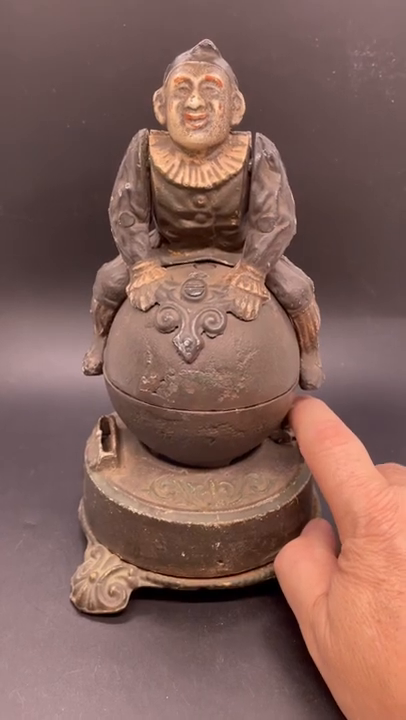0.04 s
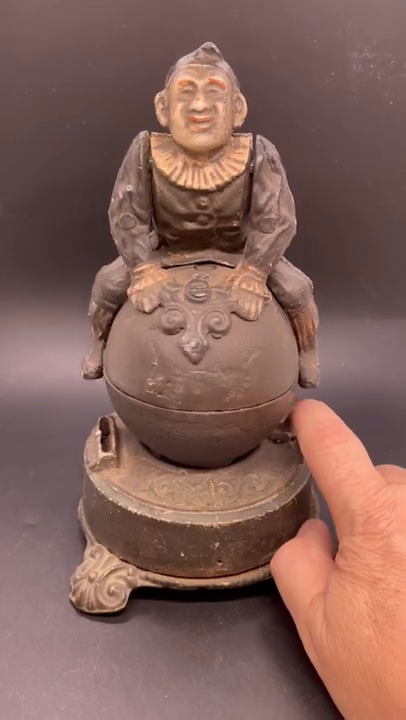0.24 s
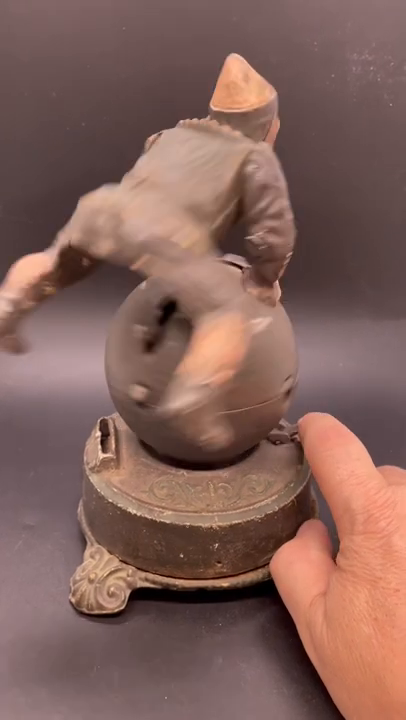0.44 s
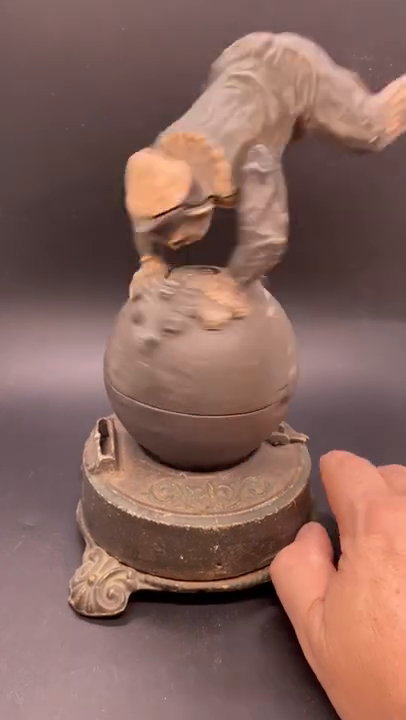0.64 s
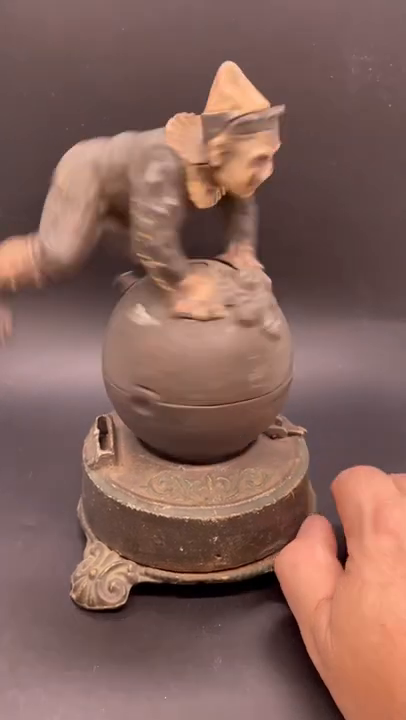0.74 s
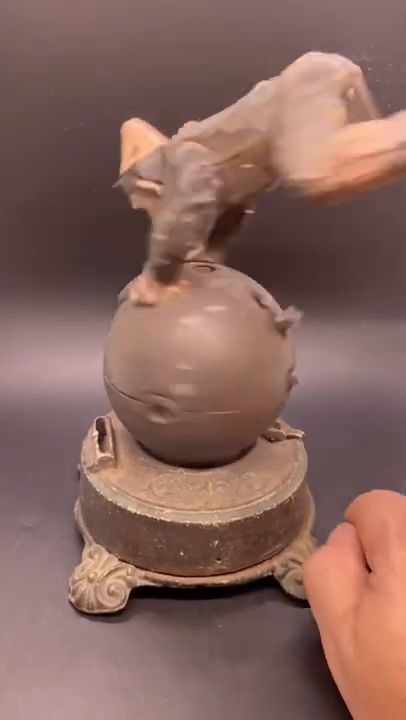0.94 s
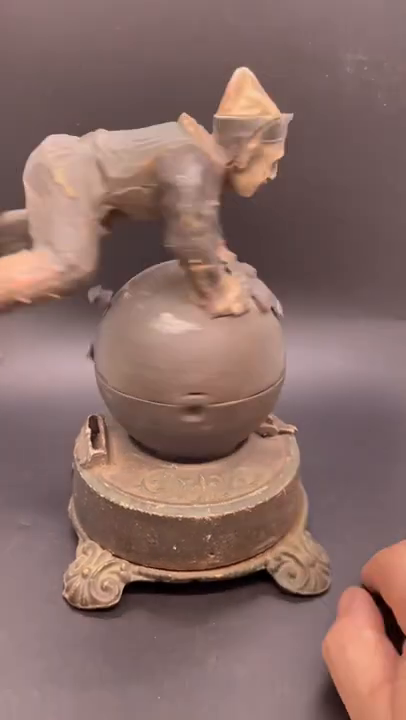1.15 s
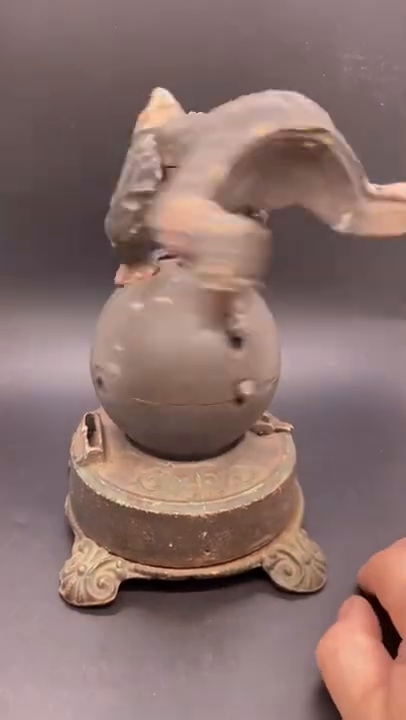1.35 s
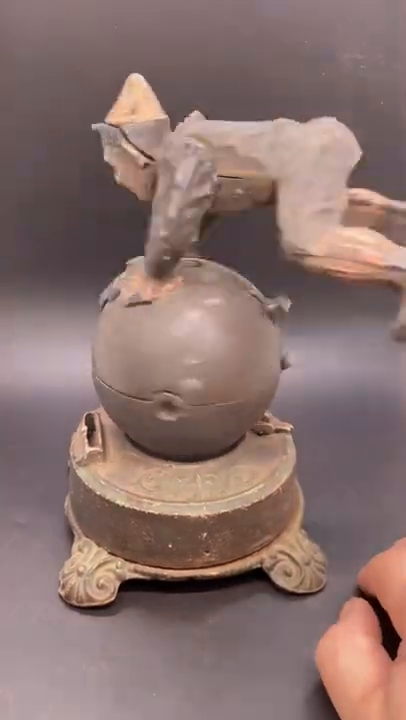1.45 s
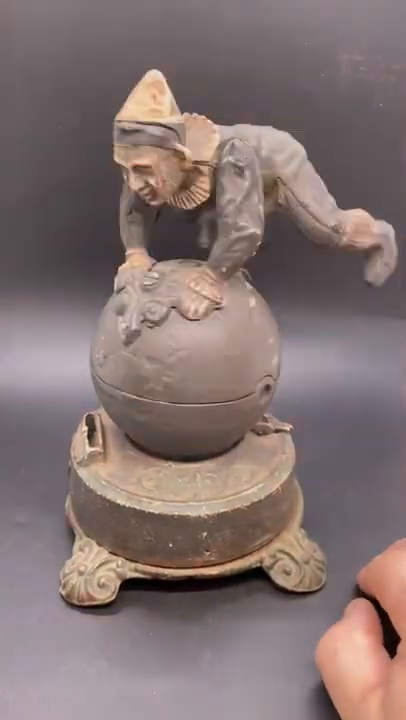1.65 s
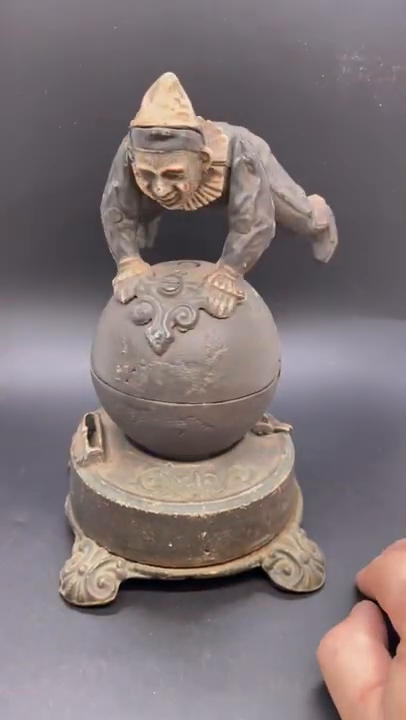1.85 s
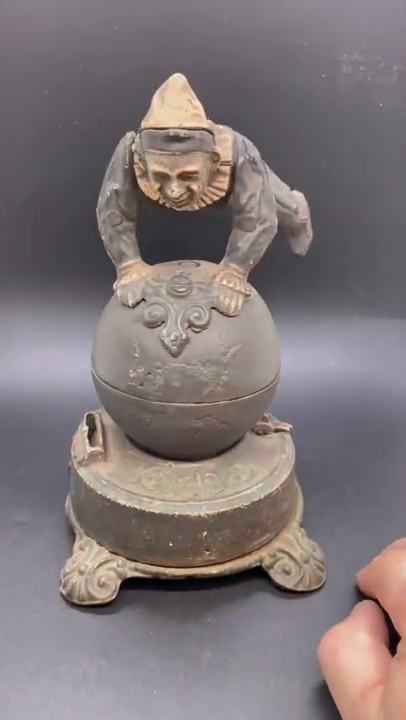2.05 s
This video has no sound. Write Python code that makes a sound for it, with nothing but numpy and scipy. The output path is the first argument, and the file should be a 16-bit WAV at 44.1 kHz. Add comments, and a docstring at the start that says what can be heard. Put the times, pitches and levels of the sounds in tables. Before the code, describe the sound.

A cast-iron mechanical bank is tripped by its lever. Faint hum until about 0.16 s, small clicks, then hard iron clacks at 0.26-0.4 s with a burst of scraping. After a brief dip, dry gritty scraping surges unevenly from 0.55 to 1.35 s, with irregular knocks and low table thuds. Weaker clanks near 1.47 s fade by 1.8 s, leaving hum. Close stereo phone pickup, short room tail.

```python
"""A sharp iron clack, then scraping and irregular knocks that die away over soft thuds and a faint room hum.
A finger trips the lever of a cast-iron coin bank and the spring throws the figure up; globe and figure
spin down on a dry, loose spindle. Noise bursts (knocks) and random slips (scrape) excite the resonances
of the casting; noise also drives the hollow base and the table top. Two close microphone ports of a
phone hear it with a short room tail, air noise and a slightly wavering hum."""
import sys
import numpy as np
from scipy import signal
from scipy.fft import rfft, irfft, next_fast_len
from scipy.io import wavfile
from scipy.ndimage import map_coordinates

SR = 44100
rng = np.random.default_rng(int(sys.argv[2]) if len(sys.argv) > 2 else 0)


def ratio(d):
    """dB to gain"""
    e = np.asarray(d, float) / 20
    return 10 ** e


def pcm_store(signal):
    """Save signal as 16-bit PCM."""
    levels = np.round(np.clip(np.atleast_2d(signal), -1, 1) * 32767)
    wavfile.write(sys.argv[1], SR, levels.astype(np.int16).T)


N = 92610

SPLIT_HZ = 3200  # scrape and knocks have a drive of their own above this
SHEEN_DB = 13.5  # gain of the drive above SPLIT_HZ


def unit(x):
    """Normalization by mean power: scaled to rms 1."""
    return x / np.sqrt(np.mean(x ** 2) + 1e-20)


def along(points, hz):
    """Interpolation of (hz, value) points on a logarithmic frequency axis."""
    f, v = np.transpose(points)
    return np.interp(np.log(hz + 1), np.log(f + 1), v)


def wobble(rate):
    """Slow random modulation: a spline through `rate` normal random knots a second."""
    knots = rng.standard_normal(N // 100)
    return map_coordinates(knots, [np.arange(N) * rate / SR])


def filtered(x, response):
    """Linear filtering: the spectrum of x times a complex response of frequency."""
    m = next_fast_len(N + SR // 2)
    f = np.fft.rfftfreq(m, 1 / SR)
    return irfft(rfft(x, m) * response(f), m)[..., :N]


def level(response):
    """Power normalization: white noise keeps its rms through the response."""
    return response / np.sqrt(np.mean(np.abs(response) ** 2))


def below(f, hz=SPLIT_HZ):
    """Low-pass crossover gain; one minus it is the complementary high-pass."""
    return 1 / (1 + (f / hz) ** 8)


def modes(table, f):
    """Modal superposition: a causal sum of damped resonances of alternating sign."""
    total = 0
    for k, (centre, width, db) in enumerate(table):
        damping = 1j * f * width
        total = total + (-1) ** k * ratio(db) * damping / (centre * centre - f * f + damping + 1e-9)
    return total


def causal(gain):
    """Minimum-phase response of a gain, by folding its cepstrum onto positive time."""
    c = irfft(np.log(gain + 1e-6))
    h = len(c) // 2
    folded = np.r_[c[0], 2 * c[1:h], c[h], np.zeros(h - 1)]
    return np.exp(rfft(folded))


def bank():
    """Coupled structures: scrape and knocks excite the casting; base and table answer the wobbling load."""
    scrape, rumble, treble, shake = spindle_load()
    bands, shapes, favour_hz = knock_envelopes()
    chatter = ratio(2 * wobble(61))  # flutter of the scrape: 2 dB, 61 knots a second
    burst = rng.standard_normal(N)

    def rub():
        return scraping(scrape * chatter, treble * chatter)

    def blows(hz):
        return knocking(hz, bands, shapes, favour_hz, burst)

    knock = (bands[0] @ shapes) * burst
    return iron(rub, blows) + hollow_base(rumble, knock) + table_top(shake)


def spindle_load():
    """Friction of a spinning load: drive amplitudes over time for scrape, rumble, treble and shake."""
    # the spindle rubbing, drive levels ahead of any gain or resonance:
    # start_s, scrape_db, base_rumble_db, scrape_treble_db, table_shake_db
    spin = [(0.161, -44, -52, -54, -27), (0.225, -37, -40, -52, -57), (0.233, -36.5, -30, -72, -31),
            (0.27, -24, -20, -42.5, -17.5), (0.383, -22.5, -29, -38, -23), (0.427, -46.5, -41.5, -57, -56),
            (0.551, -30, -33, -48, -28.5), (0.6, -27, -29, -43, -24), (0.682, -26.5, -36, -36.5, -26),
            (0.733, -28.5, -17.5, -35.5, -23.5), (0.767, -29.5, -42, -52.5, -32),
            (0.851, -27.5, -23.5, -43.5, -23), (0.889, -26.5, -25, -38, -22.5),
            (0.959, -23.5, -28, -38, -25.5), (1.0, -28.5, -29.5, -43, -32.5), (1.097, -26, -22.5, -39, -17),
            (1.19, -34.5, -33.5, -55, -34.5), (1.29, -32, -39, -50.5, -24.5),
            (1.334, -28.5, -32, -40, -21.5), (1.378, -48, -37.5, -66, -35),
            (1.48, -39.5, -33.5, -76, -31.5), (1.549, -49, -45, -73, -34), (1.7, -54, -38.5, -63.5, -36),
            (1.8, -65.5, -65, -80.5, -54)]
    t = np.arange(N) / SR
    start_s, *columns = np.transpose(spin)
    return [ratio(np.interp(t, start_s, db, -120, -120)) for db in columns]


def knock_envelopes():
    """Impact of finite contact time: band amplitudes and pulse shape of each knock, and its favoured pitch."""
    # knocks of loose iron parts, drive levels ahead of the gains below:
    # start_s, peak_db, brightness_db, best_caught_mode_hz
    knocks = [(0.176, -29, -2.5, 1650), (0.229, -25.5, -36, 1558), (0.261, -12.5, -34, 2540),
              (0.316, -9, -13, 854), (0.361, -14, -27.5, 741), (0.401, -15.5, -1, 741),
              (0.488, -44.5, 7, 1278), (0.617, -18.5, -13.5, 2540), (0.663, -24, -28, 2040),
              (0.698, -13, -18, 1090), (0.868, -25.5, -11.5, 741), (1.023, -18.5, -15.5, 741),
              (1.098, -23, -14.5, 1278), (1.255, -34.5, 0, 5290), (1.309, -13, -12, 1278),
              (1.37, -26.5, -15.5, 2040), (1.421, -26, -22.5, 5290), (1.471, -19, -24, 3250),
              (1.543, -35, -31.5, 854), (1.579, -30, -20, 741), (1.681, -35.5, -19, 3250),
              (1.699, -32, -29.5, 741), (1.769, -44.5, -25.5, 2040), (1.793, -42.5, -34, 854),
              (2.002, -45.5, -40.5, 854)]
    start_s, peak_db, bright_db, favour_hz = np.transpose(knocks)
    rise_s, fall_s = 0.003, 0.01  # linear rise; time constant of the Gaussian fall
    knock_db = -2.5
    usual_db, middle_share = -14, 0.8  # the middle band follows brightness in part, about the usual one
    since = np.maximum(np.arange(N) / SR - start_s[:, None], 0)
    shapes = np.minimum(since / rise_s, 1) * np.exp(-(since / fall_s) ** 2)
    tilt_db = np.array([0 * peak_db, middle_share * (bright_db - usual_db), bright_db + SHEEN_DB])
    return ratio(peak_db + knock_db + tilt_db), shapes, favour_hz


def knocking(hz, bands, shapes, favour_hz, burst):
    """Selective excitation: noise bursts in three bands, as they drive the mode at hz."""
    soft_hz, favour_db = 1100, 7  # low-to-middle crossover; favoured modes over all others
    nearness = np.exp(-(10 * np.log(hz / favour_hz)) ** 2)
    caught = ratio(favour_db * (nearness - .5))

    def split(f):
        return [below(f, soft_hz), below(f) - below(f, soft_hz), 1 - below(f)]

    return filtered((bands * caught) @ shapes * burst, split).sum(axis=0)


def scraping(scrape, treble):
    """Stick-slip friction: independent grit below and above the crossover, each with its own level."""
    body = filtered(scrape * grit(), below)
    sheen = filtered(treble * grit(), lambda f: 1 - below(f))
    return body + ratio(SHEEN_DB) * sheen


def grit():
    """Random impulses of friction: tiny slips of uneven size and either sign, rms 1."""
    grains_per_s, spread_db = 2500, 3.2
    hit, size, sign = rng.random((3, N))
    slips = (hit < grains_per_s / SR) * ratio(-spread_db * np.log(size + 1e-4))
    return unit(slips * np.sign(sign - .5))


def iron(rub, blows):
    """Modal resonance of the casting: strong modes, each with its own slips, over a bed of weak ones."""
    # strong modes of the casting, gains relative: centre_hz, width_hz, gain_db
    strong = [(753, 130, 18.5), (854, 27, 9), (1090, 100, 4.5), (1278, 89, 6.5), (1603, 120, 3),
              (2040, 110, 6.5), (2544.5, 45, 11), (3250, 36, 8), (3820, 150, 1), (4927, 86, 0.5),
              (5290, 900, -1), (10700, 72, -43.5)]
    # weak modes between them, as a smooth relative gain: frequency_hz, gain_db
    between = [(450, -30), (750, -29), (1000, -22), (2500, -3.5), (2900, -11.5), (4400, -28), (5200, 0.5),
               (7500, -46.5), (10000, -9), (16000, -43.5)]
    turn_db, turn_per_s = 6, 22  # each mode is caught unevenly as the contact wanders
    hz = np.arange(1, SPLIT_HZ)
    power = np.abs(modes(strong, hz)) ** 2 + ratio(2 * along(between, hz))
    scale = 1 / np.sqrt(np.sum(power) / (SR / 2))
    ring = 0
    for mode in strong:
        turn = ratio(turn_db * (wobble(turn_per_s) - .5))
        ring = ring + filtered(rub() * turn + blows(mode[0]), lambda f: modes([mode], f))
    # at 1 Hz no knock is favoured, so the bed takes them all alike
    bed = filtered(rub() + blows(1), lambda f: causal(ratio(along(between, f))))
    return scale * (ring + bed)


def hollow_base(rumble, knock):
    """Resonance of a hollow body: rumble noise and the low part of the knocks drive a few broad modes."""
    # modes of the hollow base, gains relative: centre_hz, width_hz, gain_db
    base = [(250, 53, 4.5), (338, 85, -0.5), (162, 91, 1)]
    drive = rumble * rng.standard_normal(N) + ratio(-4.5) * knock
    return filtered(drive, lambda f: level(modes(base, f)))


def table_top(shake):
    """Forced vibration of a plate: shaking noise passes twice through the low modes of the table."""
    # modes of the table top in a single pass, gains relative: centre_hz, width_hz, gain_db
    plate = [(67.4, 28, -6), (90.4, 29.3, 2.5), (114.5, 71.3, -1)]
    return filtered(shake * rng.standard_normal(N), lambda f: level(modes(plate, f) ** 2))


def ports(x):
    """Interaural-like differences: each of two microphone ports has its own balance and phase."""
    # left over right: frequency_hz, level_db
    balance = [(350, 1.5), (1300, -3), (2600, 4.5), (4500, 0.5)]
    # phase by which left leads right: frequency_hz, lead_rad
    lead = [(250, 0), (950, -1), (2500, .5), (4900, -.5), (7100, 3.0), (8300, 3.3), (11000, 6.3),
            (14400, 9.5)]
    side = np.array([[.5], [-.5]])
    return filtered(x, lambda f: ratio(side * along(balance, f)) * np.exp(1j * side * along(lead, f)))


def room(x):
    """Reverberation: convolution with exponentially decaying noise, drawn for each microphone."""
    # reverberation time: frequency_hz, t60_s
    decay = [(150, 0.24), (1000, 0.23), (8000, 0.076)]
    # gain of the tail: frequency_hz, gain_db
    colour = [(100, -56), (300, -10), (1200, -10), (6000, -7.5)]
    hz, t, z = signal.stft(rng.standard_normal((2, SR // 4)), SR, nperseg=256)
    fading = z * ratio(-60 * t / along(decay, hz)[:, None])
    tail = signal.istft(fading, SR, nperseg=256)[1]
    wet = signal.fftconvolve(x[None], tail / np.linalg.norm(tail[0]), axes=1)[:, :N]
    return filtered(wet, lambda f: ratio(along(colour, f)))


def air_noise():
    """Partial coherence: mid and side noise mixed so that left and right grow unlike with frequency."""
    # spectrum of the air noise, shape only: frequency_hz, level_db
    air = [(25, -48), (64, -8), (92, -11.5), (134, -11), (180, -14), (607, -35), (4370, -54),
           (16000, -80.5)]
    # left-right correlation of the air noise: frequency_hz, correlation
    alike = [(100, 0.94), (4000, 0.096)]

    def response(f):
        turn = np.arccos(np.clip(along(alike, f), -1, 1)) / 2
        return ratio(along(air, f)) * [np.cos(turn), np.sin(turn)]

    mid, side = filtered(rng.standard_normal((2, N)), response)
    return ratio(-46) * unit(np.array([mid + side, mid - side]))  # -46 dB rms


def room_hum():
    """Tonal hum: a sine whose level and phase waver slightly at random."""
    # hum, level before the waver: pitch_hz, rms_level_db
    tones = [(118.4, -39.5)]
    waver_db = -0.5
    t = np.arange(N) / SR
    total = 0
    for hz, db in tones:
        loudness = np.sqrt(2) * ratio(db + waver_db * wobble(30))
        total = total + loudness * np.sin(2 * np.pi * hz * t + .5 * wobble(24))
    return total


def scene():
    """Superposition: the direct sound at two ports, its room tail, and the background."""
    x = bank()
    return ports(x) + room(x) + air_noise() + room_hum()


def low_pass(x):
    """Removes everything above the highest recorded frequency."""
    return signal.sosfilt(signal.butter(12, 16460, fs=SR, output="sos"), x)


def record(dry):
    """Signal chain: the finished mix as the phone stores it."""
    return low_pass(dry)


dry = scene()
out = record(dry)
pcm_store(out)
```